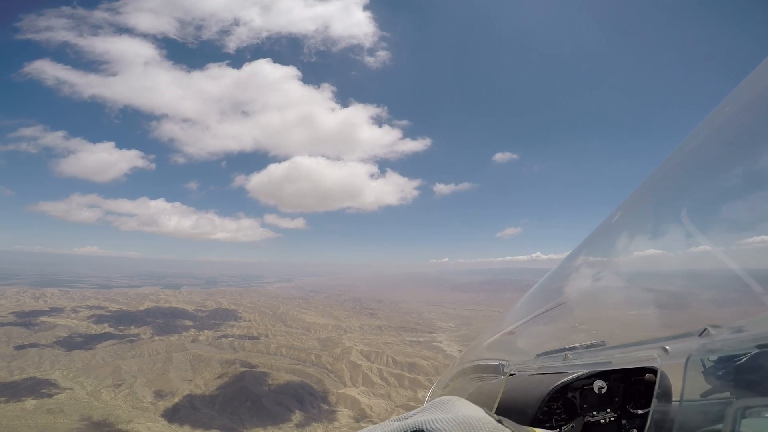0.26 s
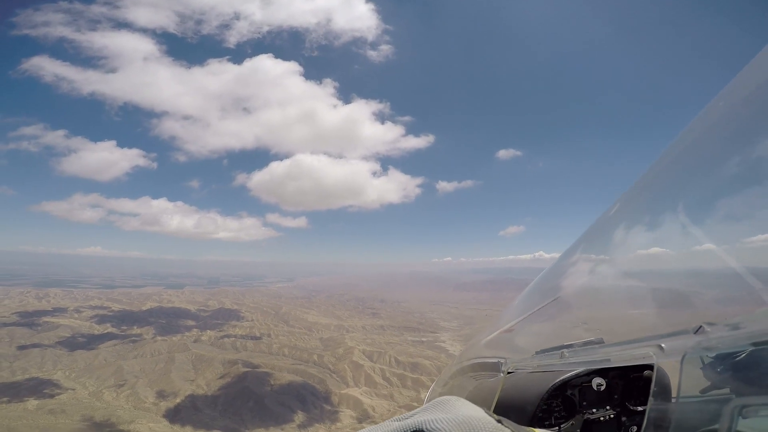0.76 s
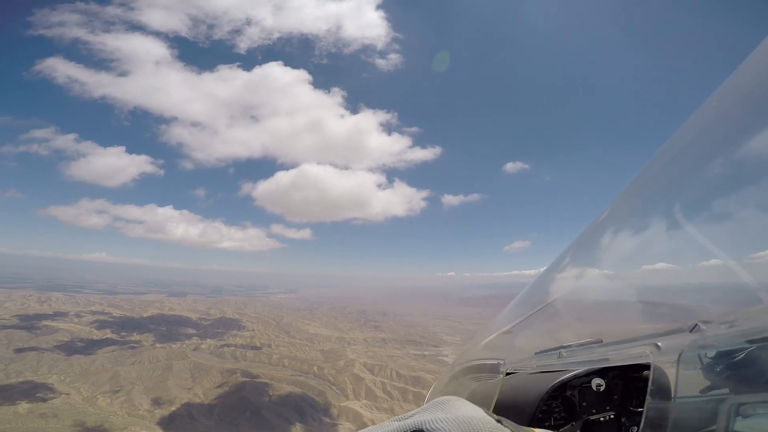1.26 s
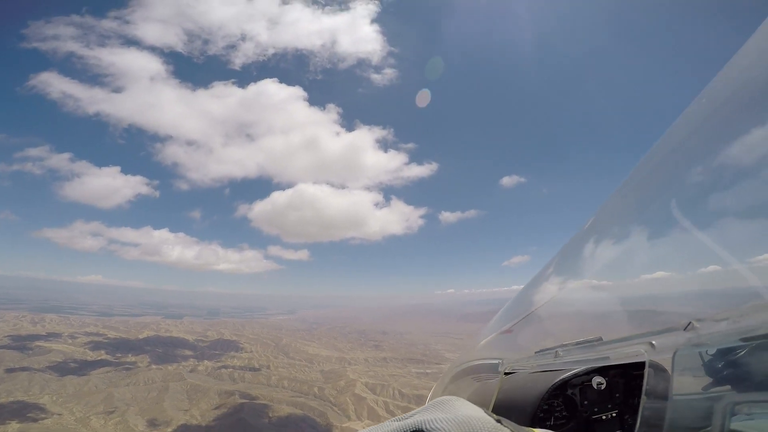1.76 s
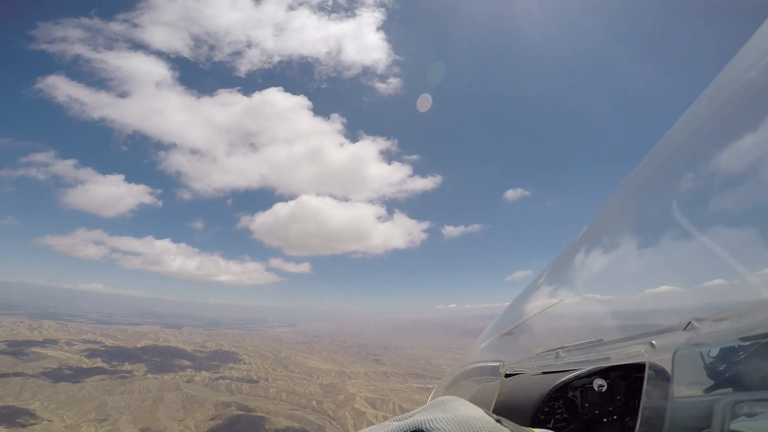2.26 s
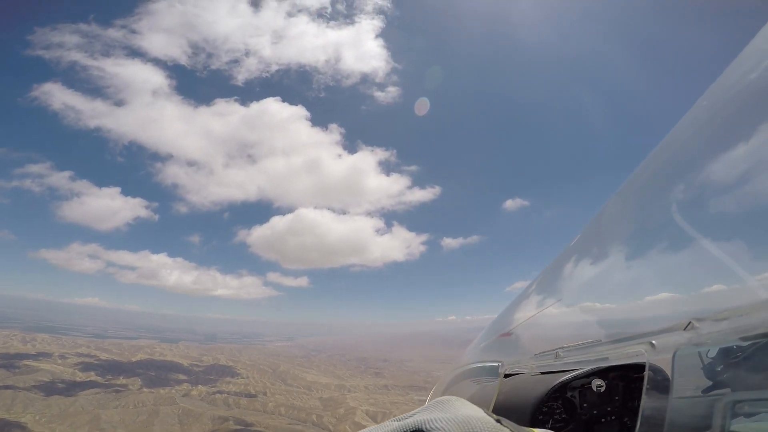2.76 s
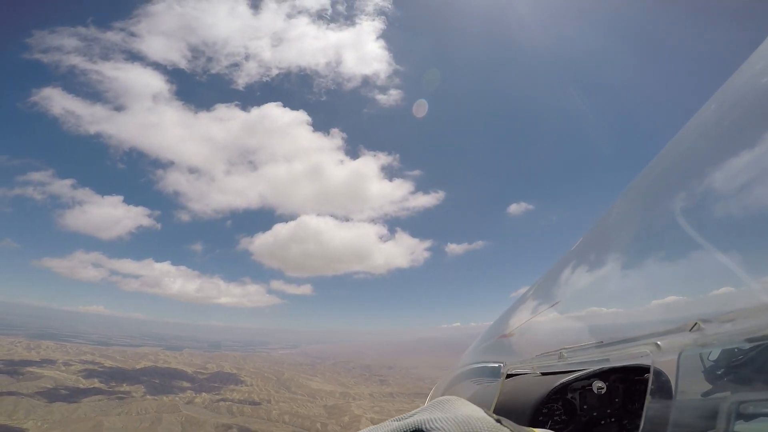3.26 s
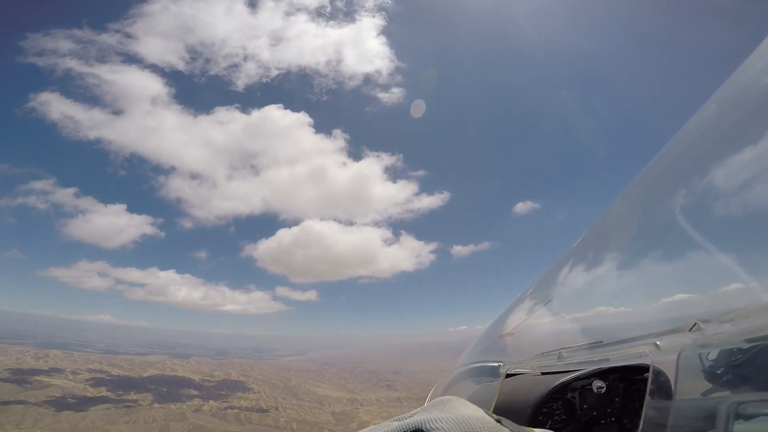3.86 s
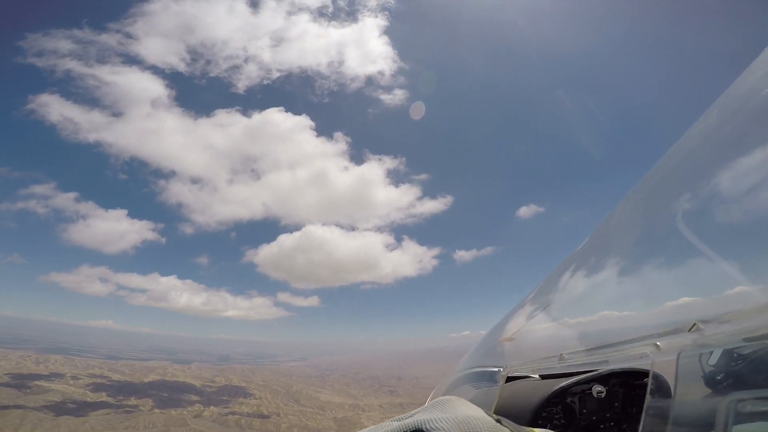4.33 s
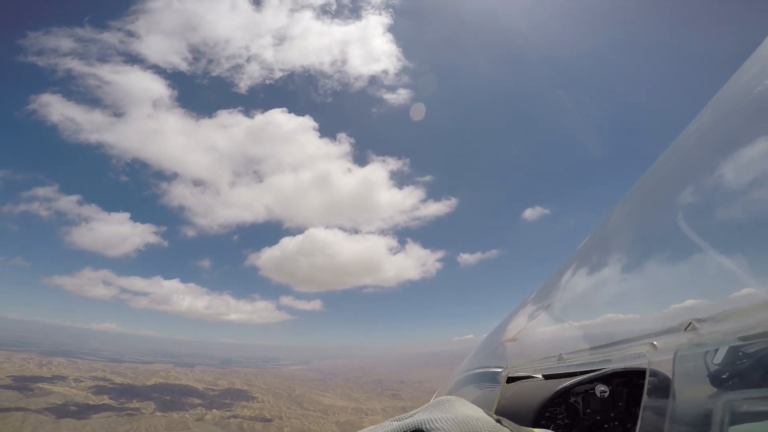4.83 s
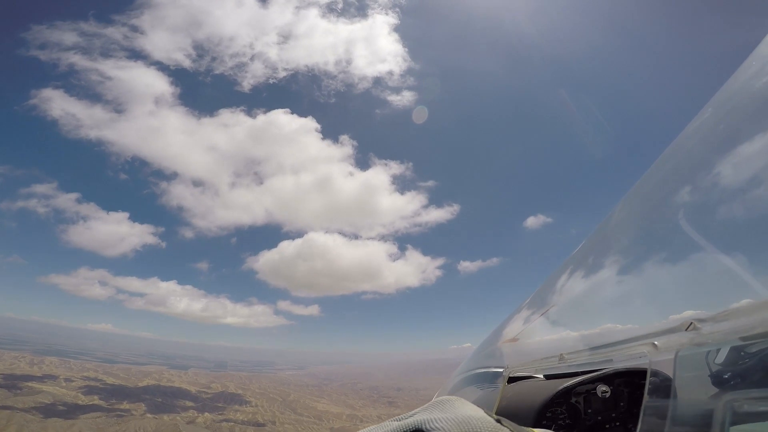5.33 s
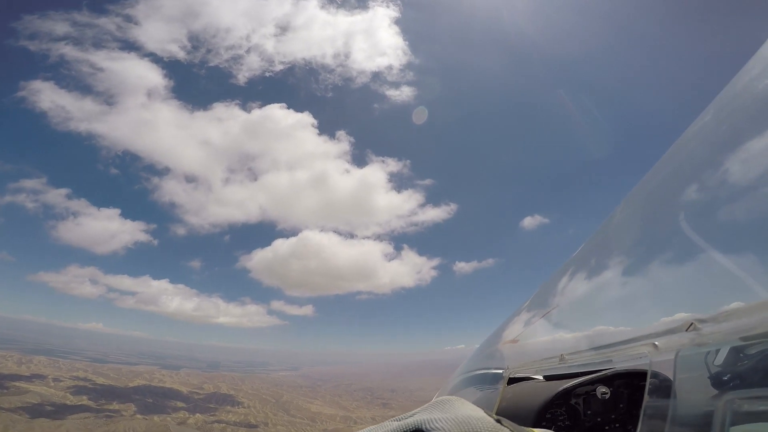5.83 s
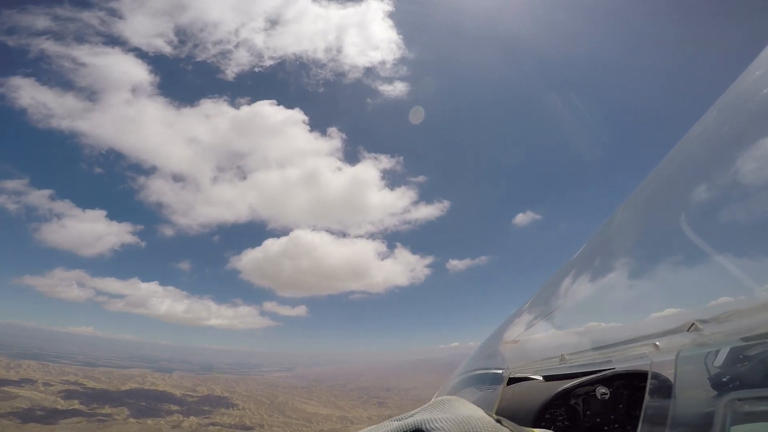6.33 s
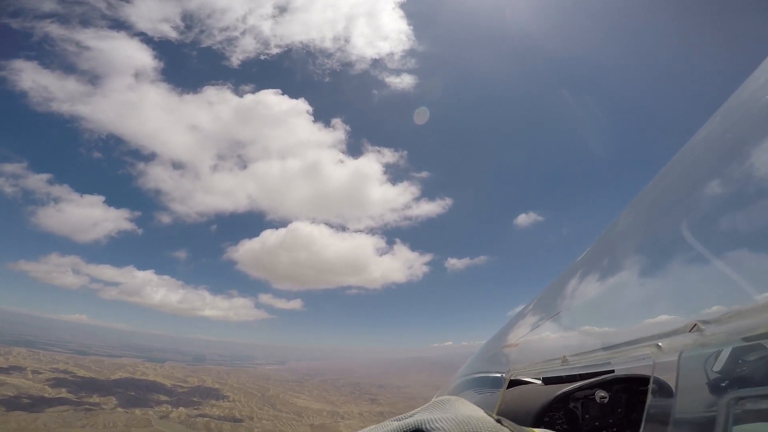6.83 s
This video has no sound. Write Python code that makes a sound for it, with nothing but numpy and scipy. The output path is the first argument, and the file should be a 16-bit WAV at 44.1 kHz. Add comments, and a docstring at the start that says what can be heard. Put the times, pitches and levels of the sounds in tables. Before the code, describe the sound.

Continuous rushing air in a gliding aircraft's cockpit: deep droning rumble, irregular soft wind thumps and patter, thin hiss from vents and seals.

```python
"""Inside the cockpit of a glider in steady flight, a small camera microphone near the canopy.
The hull booms and rumbles under the boundary layer: bands of noise, the rumble flickering.
Eddies buffet the microphone: flickering noise, a patter of pulses and short puffs, more in rough air.
Air hisses past vents and canopy seals: two higher noise bands with a shared slow swell.
A fast limiter holds the highest peaks."""
import sys
import numpy as np
from scipy import signal
from scipy.fft import rfft, irfft, next_fast_len
from scipy.io import wavfile
from scipy.ndimage import uniform_filter1d, minimum_filter1d

SR = 44100
rng = np.random.default_rng(int(sys.argv[2]) if len(sys.argv) > 2 else 0)


def int16_out(signal):
    """Quantize to a 16-bit WAV file."""
    q = np.round(np.clip(np.atleast_2d(signal).T, -1, 1) * 32767)
    wavfile.write(sys.argv[1], SR, q.astype(np.int16))


def voltage_ratio(decibels):
    """Convert decibels (scalar or array-like) to amplitude ratios, 20 dB per decade."""
    exponent = np.asarray(decibels, float) / 20
    return 10 ** exponent


N = 312531


def rms_one(x):
    """Scale to rms 1."""
    return x / np.sqrt(np.mean(x ** 2) + 1e-20)


def in_time(rows):
    """Second column of a (time, value) table, interpolated to one value per sample."""
    time_s, value = np.transpose(rows)
    return np.interp(np.arange(N) / SR, time_s, value)


def colour(x, spectrum):
    """Filter x by a gain curve, linear in dB over log frequency."""
    size = next_fast_len(N + 8192)
    freq_hz, gain_db = np.transpose(spectrum)
    bins_hz = np.fft.rfftfreq(size, 1 / SR) + 1  # +1 avoids log(0)
    gain = voltage_ratio(np.interp(np.log(bins_hz), np.log(freq_hz), gain_db))
    return irfft(rfft(x, size) * gain, size)[:N]


def drift(rate_hz):
    """Random modulation: noise at SR / 10 through two one-pole low-passes, then scaled to rms 1."""
    pole = np.exp(-2 * np.pi * 10 * rate_hz / SR)
    noise = rng.standard_normal(N // 10 + 8002)
    slow = signal.lfilter([1], [1, -2 * pole, pole * pole], noise)[8000:]  # skip filter start-up
    return np.interp(np.arange(N) / 10, np.arange(len(slow)), rms_one(slow))


def turbulence(spectrum, flicker_db):
    """Turbulent pressure: noise of flickering strength, coloured; rms 1."""
    return rms_one(colour(rng.standard_normal(N) * voltage_ratio(flicker_db), spectrum))


# roughness of the air around the cockpit: time_s, roughness_db (about its mean)
ROUGH_AIR = [(0.0, -3), (0.6, -1.5), (1.2, -1), (2.2, 0.5), (3.0, 0), (3.8, 0.5), (4.2, -1), (4.7, 1),
             (5.7, 1), (6.3, 0), (7.09, -0.5)]


def air_roughness_db():
    """Slow course of the roughness that sets the layer levels and crowds the middling eddies."""
    return in_time(ROUGH_AIR)


# hull boom spectrum: freq_hz, density_db (per Hz, relative)
BOOM_SPECTRUM = [(10, -30), (22, 1), (30, 6), (40, 8.5), (50, 11), (58, 11), (66, 12.5), (76, 9.5),
                 (92, 9.5), (112, 1), (200, -30), (400, -90)]


def hull_boom(rough_db):
    """Hull driven by the boundary layer: steady low noise, slightly weaker in rough air."""
    return voltage_ratio(-14.5 - 0.23 * rough_db) * turbulence(BOOM_SPECTRUM, 0)


# hull rumble spectrum: freq_hz, density_db (per Hz, relative)
RUMBLE_SPECTRUM = [(40, -7.5), (80, -8), (110, 2), (170, -2), (300, -3), (400, -5), (500, -12.5),
                   (650, -25), (1000, -61), (2000, -90)]


def hull_rumble(rough_db, gust, flutter):
    """Boundary-layer rumble of the hull: low noise, flickering a little with the gusts."""
    return voltage_ratio(-13.5 + 0.4 * rough_db) * turbulence(RUMBLE_SPECTRUM, 0.36 * gust + 1.7 * flutter)


# spectrum of eddies at the microphone, also for patter and puffs: freq_hz, density_db (per Hz, relative)
BUFFET_SPECTRUM = [(100, -7), (250, 1), (450, -3), (700, -10.5), (1000, -16.5), (1500, -23.5),
                   (2500, -29.5), (5000, -54), (12000, -80)]


def buffeting(rough_db, gust, flutter):
    """Unresolved eddies at the microphone: noise with strong flicker, rising fast with roughness."""
    return voltage_ratio(-28 + 1.5 * rough_db) * turbulence(BUFFET_SPECTRUM, 0.47 * gust + 4.4 * flutter)


def small_eddy_patter(rough_db, gust, flutter):
    """Small eddies: random pressure pulses, mostly weak, a few strong, denser in gusts."""
    eddies_per_s = 500 * voltage_ratio(3.0 * gust + 3.0 * flutter)
    size_db = 3.26 * np.minimum(rng.exponential(1, N), 4)
    pulses = voltage_ratio(size_db) * rng.choice([-1, 1], N)
    born = rng.random(N) < eddies_per_s / SR
    return voltage_ratio(-26 + 2 * rough_db) * rms_one(colour(pulses * born, BUFFET_SPECTRUM))


def middling_eddies(rough_db):
    """Chance eddies, crowding in rough air; rows of start_s, peak_db, edge_re_peak_db."""
    mean_per_s, rate_db_per_rough_db = 5.5, 1.5
    share = np.cumsum(voltage_ratio(rate_db_per_rough_db * rough_db))
    draws = rng.random(int(mean_per_s * N / SR))
    start_s = np.interp(draws, share / share[-1], np.arange(N) / SR)
    start_s = start_s * (1 - 0.03 * SR / N)  # room for the last puff
    peak_db = -20.5 + 1 * rng.standard_normal(len(start_s))
    edge_re_peak_db = -23 + 4.5 * rng.standard_normal(len(start_s))
    return np.column_stack([start_s, peak_db, edge_re_peak_db])


# strongest eddies striking the microphone: start_s, peak_db, edge_re_peak_db (treble edge)
STRONG_EDDIES = [(0.224, -16.5, -24), (0.706, -18.5, -20), (0.877, -21, -17), (1.1, -15, -19),
                 (1.258, -11.5, -32), (1.391, -13, -21), (1.417, -14.5, -17), (1.899, -18, -30),
                 (2.331, -16, -21), (2.612, -16.5, -14), (2.839, -18, -24), (3.178, -13, -26),
                 (3.538, -16.5, -31), (4.498, -17.5, -16), (4.654, -11.5, -33), (4.762, -10, -35),
                 (4.984, -13.5, -25), (5.146, -8.5, -30), (5.263, -18, -18), (5.514, -21, -14),
                 (6.086, -14, -21), (6.221, -16, -26), (6.48, -12.5, -25)]


def eddy_puffs(rough_db):
    """Strong and middling eddies: a pressure pulse in a noise puff dying in ms, sharp ones with more treble."""
    decay_s, puff_s, edge_band_hz = 0.00249, 0.03, [1300, 3600]
    rows = np.vstack([STRONG_EDDIES, middling_eddies(rough_db)])
    age = np.arange(int(puff_s * SR)) / SR / decay_s
    shape = age * np.exp(1 - age)  # peaks at 1 after decay_s
    dull, sharp = np.zeros((2, N + len(shape)))
    pulses = np.zeros(N)
    signs = rng.choice([-1, 1], len(rows))
    for (start_s, peak_db, edge_re_peak_db), sign in zip(rows, signs):
        at = round(start_s * SR)
        dull[at:at + len(shape)] += voltage_ratio(peak_db) * shape
        sharp[at:at + len(shape)] += voltage_ratio(peak_db + edge_re_peak_db) * shape
        pulses[at + round(decay_s * SR)] = sign * voltage_ratio(peak_db)
    body = turbulence(BUFFET_SPECTRUM, 0)
    band = signal.butter(2, edge_band_hz, "band", fs=SR, output="sos")
    edge = rms_one(signal.sosfilt(band, rng.standard_normal(N)))
    thump = voltage_ratio(32.0) * colour(pulses, BUFFET_SPECTRUM)
    return dull[:N] * body + sharp[:N] * edge + thump


# slow swell of the hiss: time_s, seal_hiss_db
HISS_SWELL = [(0.05, -43), (0.98, -41.5), (2.55, -43), (3.59, -41), (4.25, -42), (4.68, -41), (5.43, -42.5),
              (5.74, -41), (7.0, -43.5)]


def hiss_levels_db():
    """Levels of vent and seal hiss; the vent shares most of the seals' swell."""
    seals_db = in_time(HISS_SWELL)
    mean_db = seals_db.mean()
    vent_db = mean_db + 5.5 + 0.76 * (seals_db - mean_db)
    return vent_db, seals_db


# vent hiss, humped by small cavities: freq_hz, density_db (per Hz, relative)
VENT_SPECTRUM = [(300, -16), (700, 11.5), (1300, 3), (2000, -0.5), (2700, 2.5), (3250, 2), (3800, -8),
                 (5000, -17), (9000, -45.5)]


def vent_hiss(vent_db, flutter):
    """Air past the vents: the lower hiss, with the shared flutter and a drift of its own."""
    return voltage_ratio(vent_db) * turbulence(VENT_SPECTRUM, 0.52 * flutter + 0.64 * drift(35.0))


# canopy seal hiss, humped by small cavities: freq_hz, density_db (per Hz, relative)
SEALS_SPECTRUM = [(2000, -20), (3800, -5.5), (4950, -1), (6200, -8.5), (8300, -15.5), (9000, -14),
                  (10300, -15), (11200, -20), (13500, -21), (15200, -26), (18000, -35)]


def seal_hiss(seals_db, flutter):
    """Air past the canopy seals: the higher hiss, with the shared flutter and a drift of its own."""
    return voltage_ratio(seals_db) * turbulence(SEALS_SPECTRUM, 0.57 * flutter + 0.39 * drift(30.0))


def scene():
    """Sums hull, eddies and hiss under one roughness, one gust and one flutter signal."""
    rough_db = air_roughness_db()
    gust, flutter = drift(13.0), drift(70.0)
    vent_db, seals_db = hiss_levels_db()
    hull = hull_boom(rough_db) + hull_rumble(rough_db, gust, flutter)
    buffet = buffeting(rough_db, gust, flutter)
    patter = small_eddy_patter(rough_db, gust, flutter)
    puffs = eddy_puffs(rough_db)
    hiss = vent_hiss(vent_db, flutter) + seal_hiss(seals_db, flutter)
    return (hull + buffet + patter + puffs + hiss)[None]


def limiter(x):
    """Looks ahead, ducks just enough to keep peaks at the limit, recovers at a steady rate."""
    limit, attack_s, release_db_per_s = 0.89, 0.0011, 250  # limit re full scale
    over_db = np.maximum(20 * np.log10(np.abs(x) / limit + 1e-9), 0)
    ramp_db = release_db_per_s * np.arange(N) / SR
    held_db = np.maximum.accumulate(over_db + ramp_db) - ramp_db
    width = max(int(attack_s * SR), 1)
    ahead_db = minimum_filter1d(-held_db, size=2 * width + 1)
    duck_db = uniform_filter1d(ahead_db, size=width)
    return x * voltage_ratio(duck_db)


def low_pass(x):
    """Removes everything above the highest recorded frequency."""
    return signal.sosfilt(signal.butter(12, 15200, fs=SR, output="sos"), x)


def record(dry):
    """Limits the peaks of the microphone signal."""
    mix = limiter(dry[0])[None]
    return low_pass(mix)


dry = scene()
out = record(dry)
int16_out(out)
```